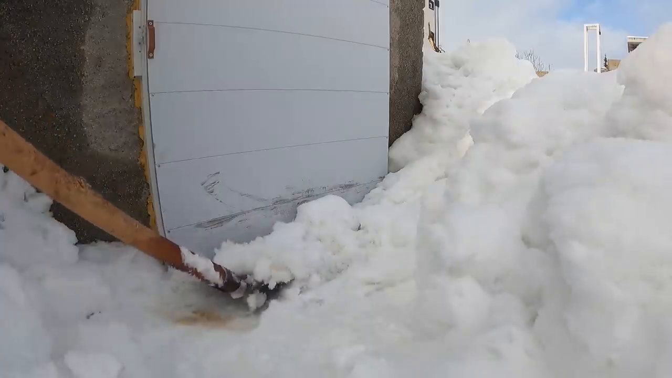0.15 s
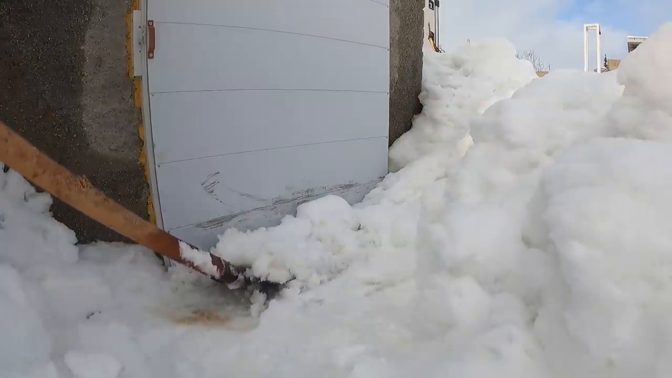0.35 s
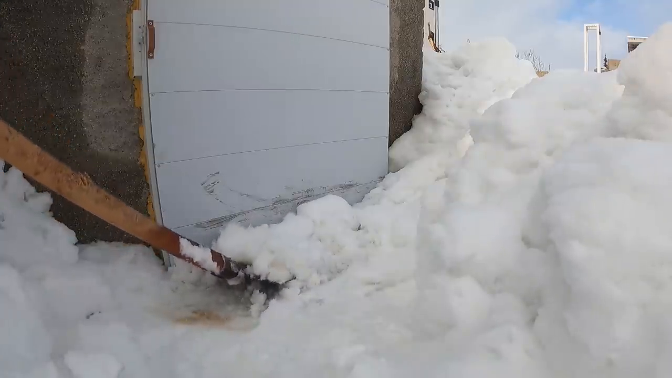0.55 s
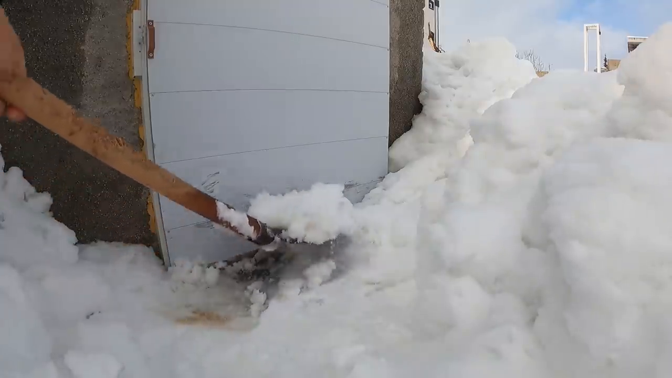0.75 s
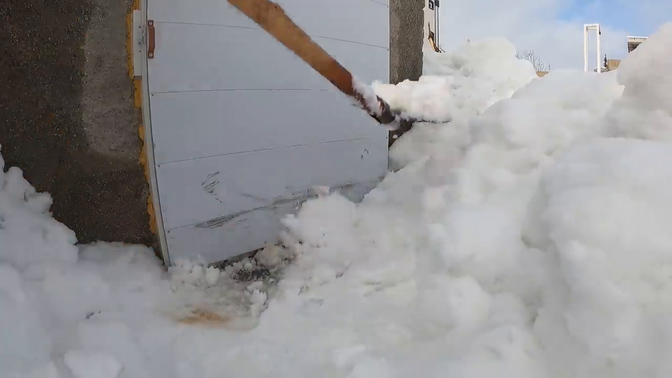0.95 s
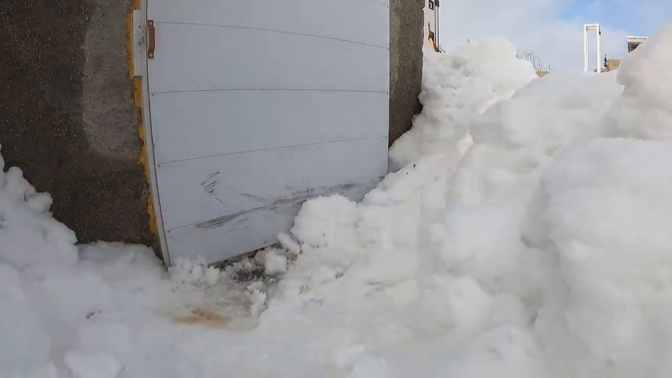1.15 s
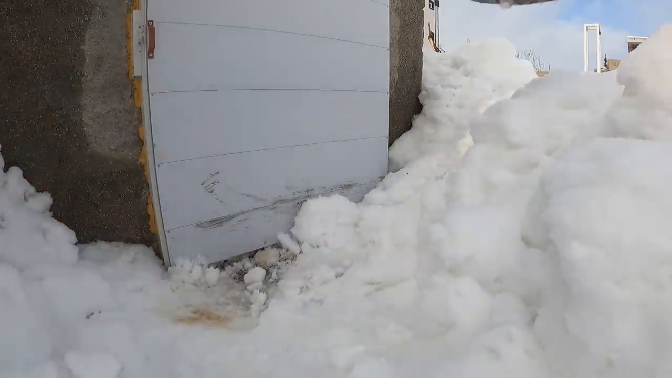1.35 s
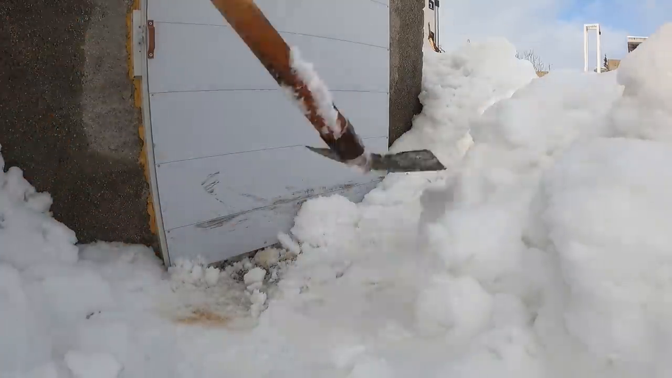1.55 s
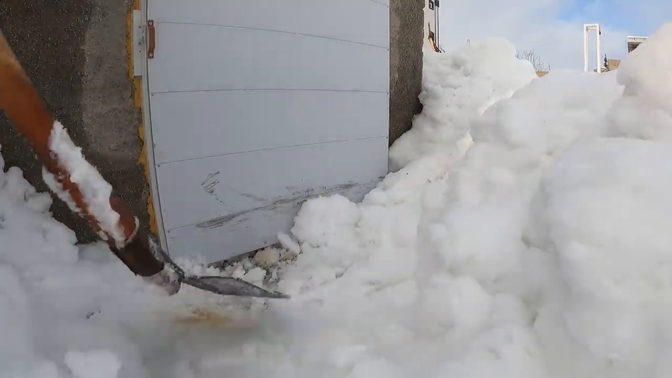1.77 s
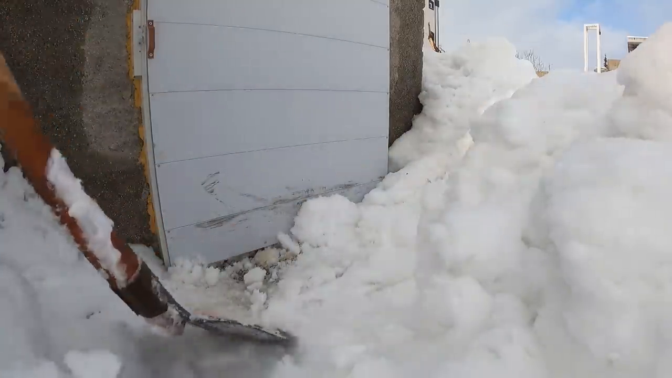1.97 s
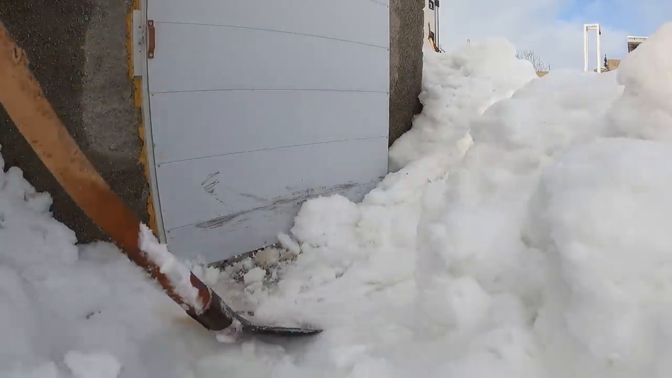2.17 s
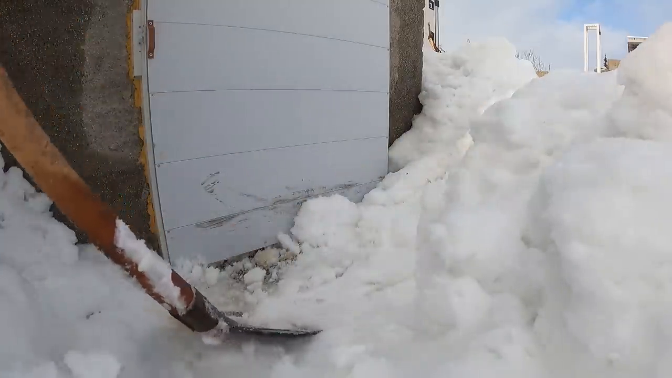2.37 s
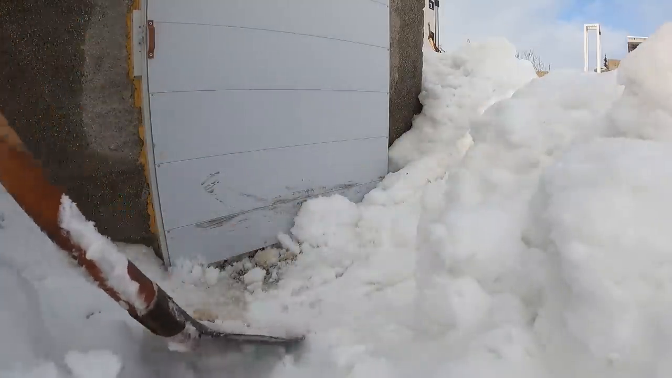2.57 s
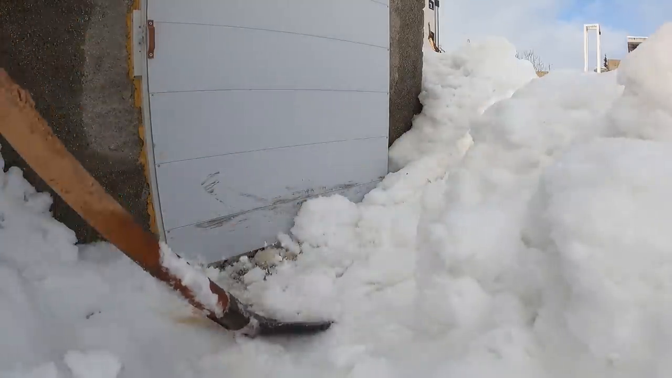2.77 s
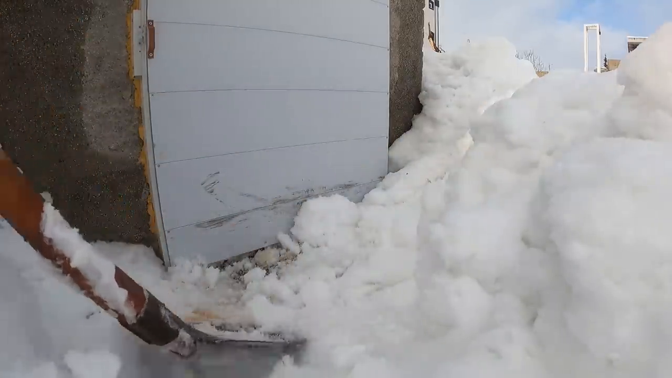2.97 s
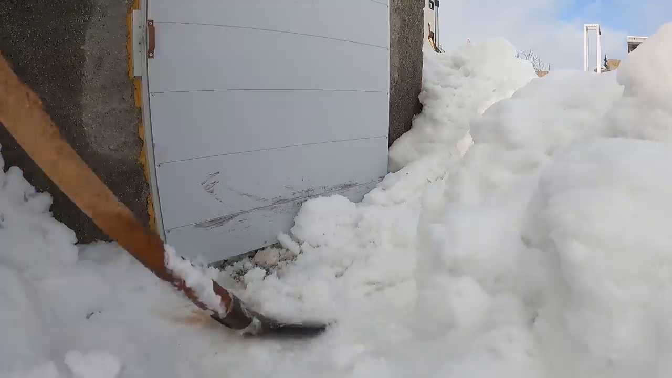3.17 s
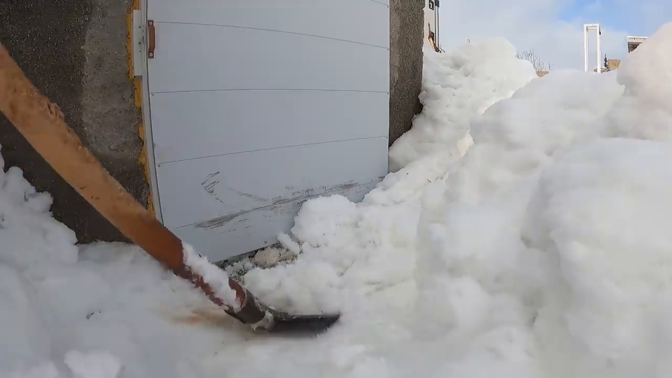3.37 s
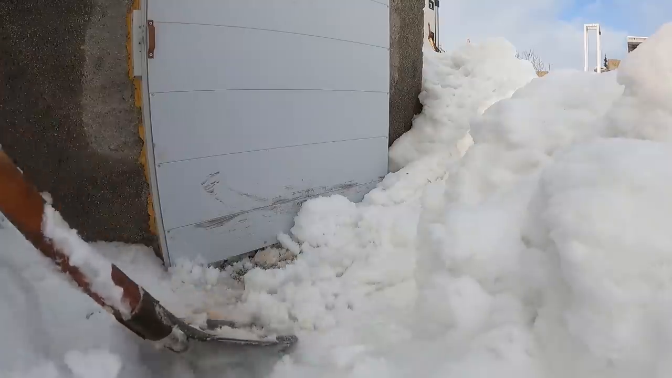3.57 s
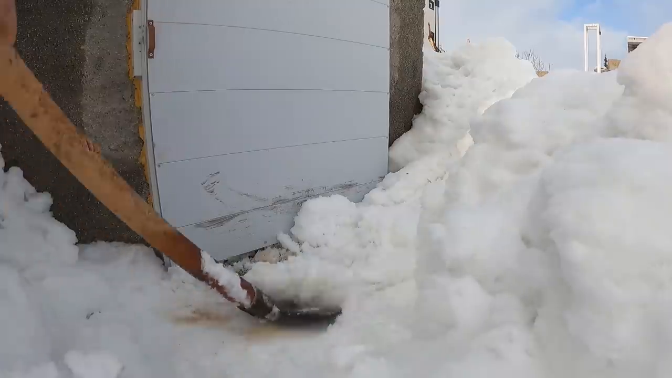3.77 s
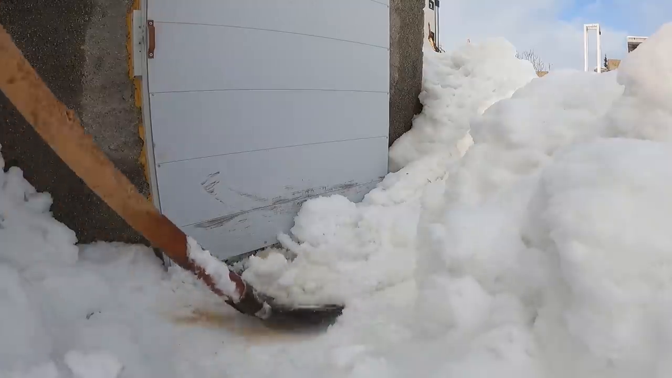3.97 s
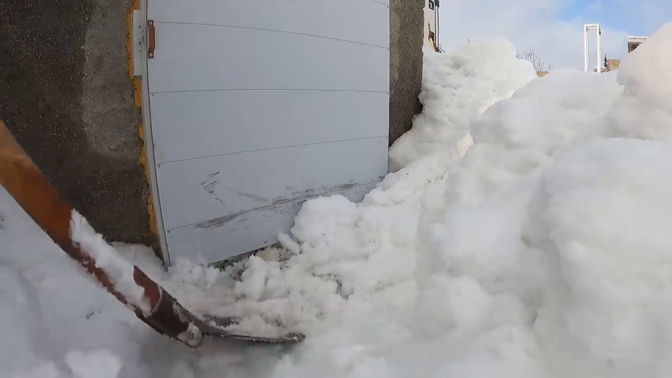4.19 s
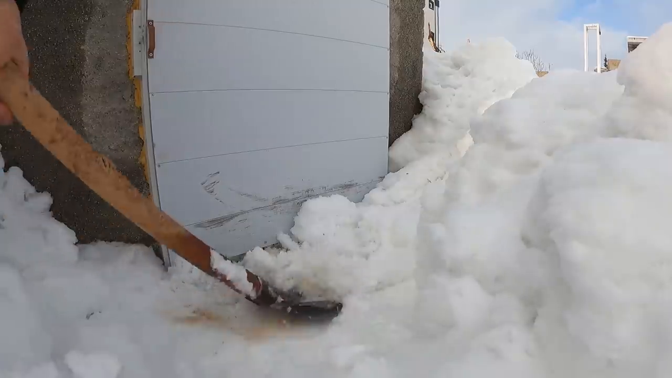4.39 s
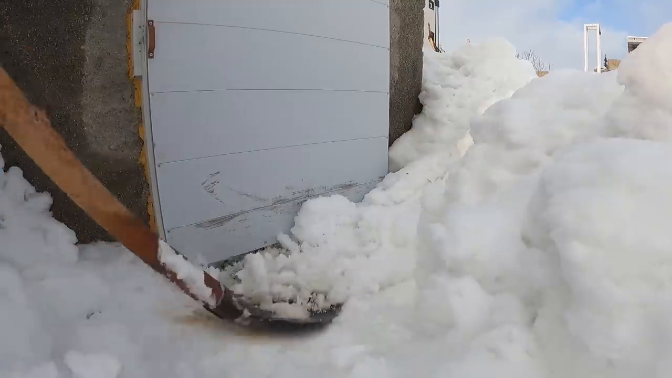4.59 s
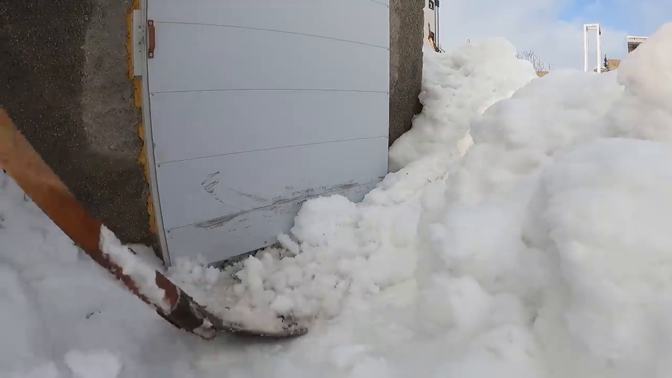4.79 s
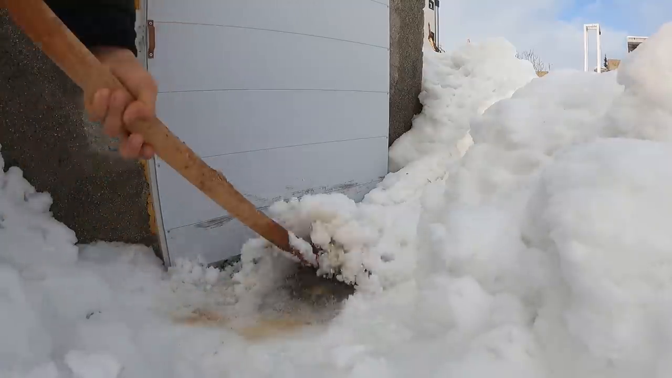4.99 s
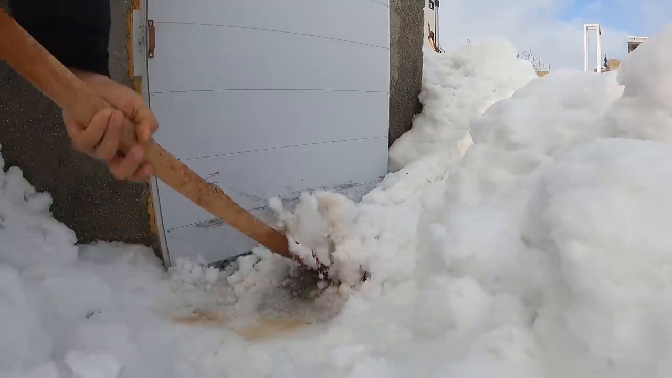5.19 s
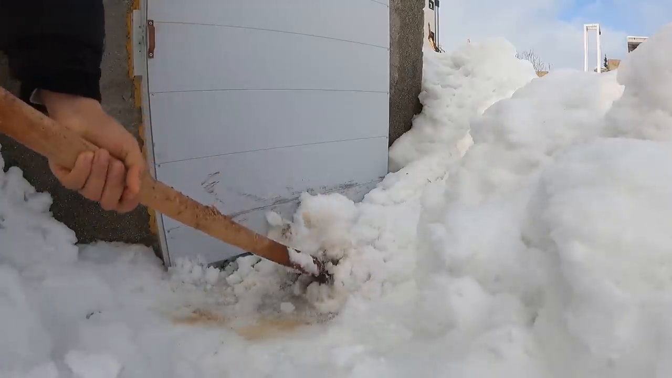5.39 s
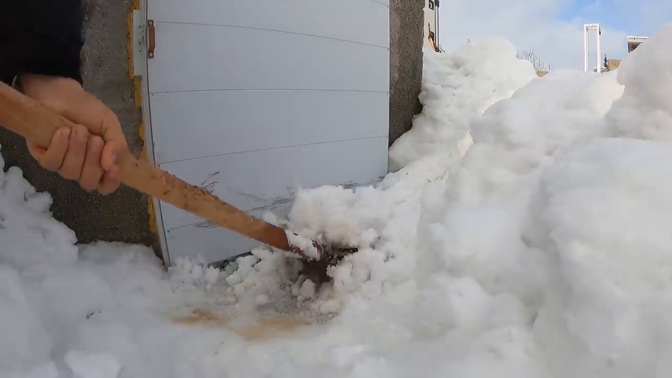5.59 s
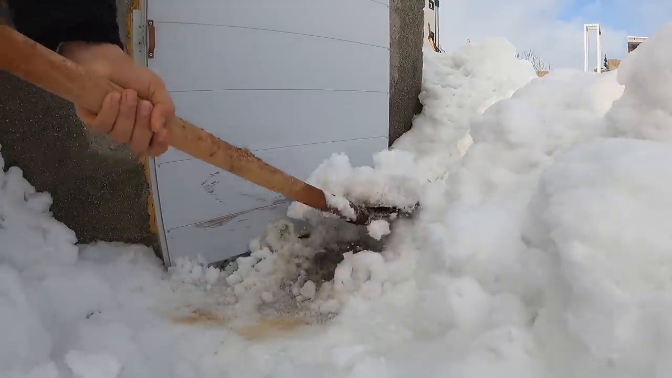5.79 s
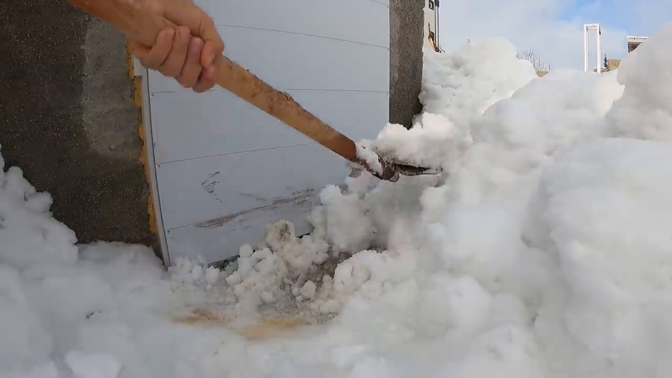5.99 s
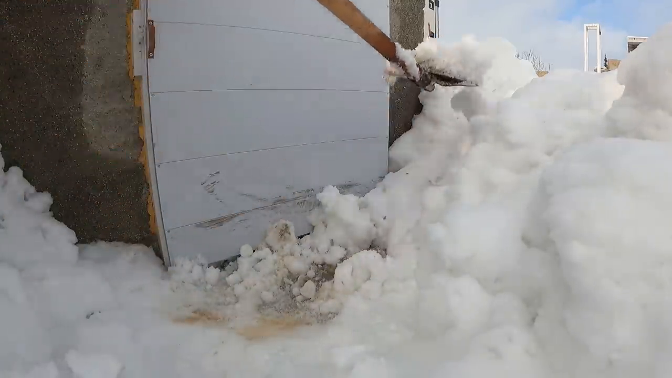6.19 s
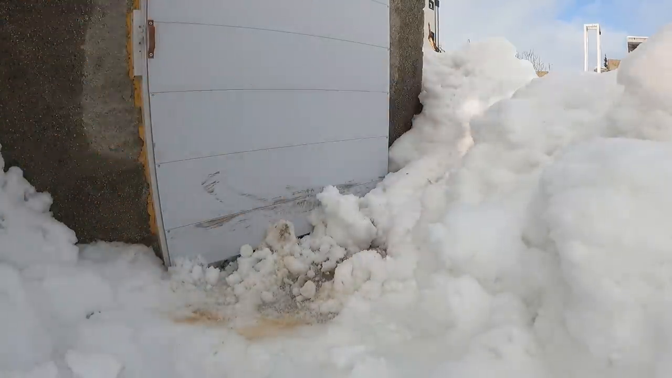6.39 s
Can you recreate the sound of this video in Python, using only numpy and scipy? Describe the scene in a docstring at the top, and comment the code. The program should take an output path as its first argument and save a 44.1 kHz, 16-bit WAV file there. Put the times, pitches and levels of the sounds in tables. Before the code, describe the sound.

A steel shovel works packed snow close by, outdoors, over a very faint distant wash. It opens with a low puff of air on the microphone and soft crumbling as snow slides off the blade. At about 1.0 and 1.4 seconds thrown clods land with crisp snaps and dull splats, and the empty blade rings very faintly. Five short shoves follow, near 2.1, 2.7, 3.2, 3.8 and 4.3 seconds, each a swelling, gritty metallic scrape that stops in a hard crunch, hollow knock and low crump. After each, the blade drags back more quietly, with icy clicks. At about 4.9 seconds comes a longer, louder scrape, stopping dead just after 5.1. Loose snow then slides and trickles, with clods thudding around 5.3 to 5.7 seconds. Light air buffeting, small splats and sifting crumbs fade out by about 6.4 seconds.

```python
"""A steel shovel works packed snow close by: ice bonds fracture in dense clumps, a crunch that also
excites the damped modes of the blade and of the whole shovel. It throws one load and rings faintly,
then is shoved in five times until it jams, and is drawn back each time. A long last scrape fills the
blade; loose snow slides and clods drop as it is lifted. The pack yields with a low crump, moving air
buffets the microphone, and a door and the snow bank scatter the sound over a faint distant noise."""
import sys
import numpy as np
from scipy import signal
from scipy.fft import rfft, irfft, next_fast_len
from scipy.io import wavfile
from scipy.ndimage import uniform_filter1d, map_coordinates

SR = 44100
rng = np.random.default_rng(int(sys.argv[2]) if len(sys.argv) > 2 else 0)


def pcm_store(signal):
    """Save signal as 16-bit PCM."""
    levels = np.round(np.clip(np.atleast_2d(signal), -1, 1) * 32767)
    wavfile.write(sys.argv[1], SR, levels.astype(np.int16).T)


N = 284445

# The blade jams in the bank: (t/s, length/s, crunch/dB, blade hum/dB, shovel knock/dB, snow pack/dB)
JAMS = [(2.196, .018, -16, -23, -13.5, -13), (2.775, .024, -15, -23, -14, -18),
        (3.314, .028, -14, -18, -13, -18), (3.856, .05, -14, -25, -16.5, -20),
        (4.4, .057, -14.5, -23, -17, -23)]


def shovelling():
    """Brittle fracture: firm strokes break snow densely, loose snow crumbles in coarser grains."""
    # Spectra of snow breaking under each kind of movement: (f/Hz, relative level/dB)
    gliding = [(820, -28), (1400, -10), (1750, 0.5), (2030, -3), (2250, -4), (4030, -4.5), (4830, -5),
               (5340, -8.5), (5790, -4), (7290, -5), (10500, -14.5), (12400, -25.5), (15500, -39)]
    crushing = [(820, -26.5), (1400, -3), (1730, 2.5), (1870, -1.5), (2480, 2), (2950, -3.5), (4030, -0.5),
                (5080, 1.5), (5500, -1.5), (7290, -2.5), (9010, -13.5), (12300, -21), (15500, -44)]
    cutting = [(820, -20), (1400, -7), (1950, 0.5), (2340, 1.5), (2750, -1), (4070, -0.5), (4500, -1.5),
               (4920, 0), (6080, -4.5), (7220, -6.5), (8740, -11), (11900, -23.5), (15500, -40.5)]
    dragging = [(820, -70), (1400, -9), (1690, -10), (1890, -3), (2340, -4.5), (3070, -4), (3910, -8),
                (4830, -6), (5180, -5.5), (7440, -8), (11900, -24.5), (14300, -36), (15500, -49.5)]
    crumbling = [(820, -12), (1400, -10), (1560, -5), (1910, -1.5), (2220, -2.5), (2590, -4.5),
                 (3570, -3.5), (7370, -8), (8830, -15), (12100, -22.5), (15500, -44.5)]
    # Snow sifting from the raised blade, one curve per lift: (t/s, level/dB)
    sifting = [
        [(0.99, -48), (1.15, -52), (1.27, -44.5), (1.42, -50), (1.58, -63), (1.8, -70)],
        [(6.05, -50), (6.3, -55), (6.45, -60)],
    ]
    push, jam, cut, pull, loose = pushes(), jams(), scoop(), pulls(), loose_snow()
    thrown = sum(gains(curve)[0] for curve in sifting)
    strokes = (scrape(push, gliding, density=22000, clump_db=0.82, steel_db=4.5)
               + scrape(jam, crushing, density=18000, clump_db=1.1, steel_db=-24.5)
               + scrape(cut, cutting, density=25000, clump_db=0.3, steel_db=-9.5)
               + scrape(pull, dragging, density=16000, clump_db=1.0, steel_db=-25))
    firm_crunch, _, _, firm_pack = push + jam + cut + pull
    loose[0] += amp(-33.5) * lagged(firm_crunch, lag_s=.07)  # debris rolls on after a stroke
    loose_crunch, _, _, loose_pack = loose
    slide = scrape(loose, crumbling, density=9000, clump_db=1.03, steel_db=-0.5)
    grains = fractures(density=5600, clump_db=2.6, patchy_db=3)
    powder = filtered(grains, lambda hz: 1 + (hz / 13000) ** 4)  # fine powder is brighter
    spray = thrown * coloured(powder, crumbling)
    ticks = amp(-7.5) * (loose_crunch + thrown) * crumbs()
    pressure = lagged(firm_pack, lag_s=.016)
    crump = pack(pressure + loose_pack + amp(-1) * thrown)
    return strokes + slide + spray + ticks + crump + air(pressure)


def scrape(drive, spectrum, density, clump_db, steel_db):
    """Forced vibration: one stream of fractures is heard directly and drives the blade and shovel."""
    # Snow-damped modes of the steel, the blade and the whole shovel: (f/Hz, width/Hz, level/dB)
    steel_modes = [(1760, 90, -13.5), (2264, 27, 4.5), (2550, 70, -2.5), (2985, 41, 1.5), (3360, 160, -9.5),
                   (4050, 70, -8), (4400, 32, -15.5), (4970, 150, -0.5), (5770, 160, 0.5), (7180, 50, 7.5)]
    blade_modes = [(975, 173, -4), (1174, 187, 2), (1368, 340, -6)]
    shovel_modes = [(222, 88, -4), (392, 110, 1), (550, 112, 1), (738, 105, -0.5), (918, 100, -8.5)]

    def crunch_response(hz):
        return amp(along(spectrum, hz)) * (1 + amp(steel_db) * resonances(steel_modes, hz, sign=0.92))

    def blade_response(hz):
        return resonances(blade_modes, hz) / (1 + (hz / 2000) ** 4) / (1 + (700 / (hz + 1)) ** 4)

    crunch, hum, knock, _ = drive
    force = fractures(density, clump_db, patchy_db=2.1)
    direct = filtered(force, crunch_response)
    blade = filtered(force, blade_response)
    body = filtered(force, lambda hz: resonances(shovel_modes, hz) / (1 + (hz / 1300) ** 4))
    return crunch * unit(direct) + hum * unit(blade) + lagged(knock, lag_s=.003) * unit(body)


def fractures(density, clump_db, patchy_db):
    """Shot noise of ice bonds, density a second; the wandering contact favours ever new pitches."""
    breaks = (rng.random(N) < density / SR) * rng.standard_normal(N)
    clumps = amp(clump_db * (wobble(330) + wobble(75)))
    spectra = signal.stft(breaks * clumps, nperseg=512)[2]
    patches = uniform_filter1d(rng.standard_normal(spectra.shape), size=3, axis=0)  # across frequency
    patches = uniform_filter1d(patches, size=7, axis=1)  # across time
    return unit(signal.istft(spectra * amp(patchy_db * unit(patches)), nperseg=512)[1][:N])


def pushes(run_up_s=.075, grip_s=.006):
    """Sliding friction: a shove grows louder as the blade gathers speed over the crust."""
    # Forward shoves: (t/s, length/s, crunch at full speed/dB, drop below that at the start/dB)
    shoves = [(2.08, .118, -16.5, 22), (2.686, .091, -21.5, 21), (3.212, .103, -20.5, 31),
              (3.768, .089, -22, 28), (4.322, .077, -24, 19), (4.888, .07, -24, 26)]
    events = []
    for s, length, db, below_db in shoves:
        t = np.arange(int(length * SR)) / SR
        slowness = np.maximum(1 - t / run_up_s, 0) ** 1.8
        envelope = (1 - np.exp(-t / grip_s)) * amp(-below_db * slowness)
        events.append((s, envelope, (db, db - 7.5, db - 9.5, db - 17)))
    return tracks(events)


def jams():
    """Compaction: the bank is crushed at full force for a moment, then stops the blade."""
    return tracks((s, held(length, attack_s=.002, fall_db_per_s=1050), levels_db)
                  for s, length, *levels_db in JAMS)


def scoop():
    """Cutting resistance: the blade slows steadily under the load, then stops dead."""
    # The filling scrape: (t/s, length/s, crunch/dB, blade hum/dB, shovel knock/dB, snow pack/dB)
    filling = (4.952, .176, -12, -19.5, -22, -24.5)
    s, length, *levels_db = filling
    return tracks([(s, held(length, attack_s=.008, fall_db_per_s=1400, sag_db_per_s=40), levels_db)])


def pulls():
    """Sliding friction: the edge bites as it lands, then the drag follows a power of the arm's speed."""
    # Back strokes: (t/s, length/s, drag/dB, bite length/s, bite/dB, blade hum/dB, snow pack/dB)
    back_strokes = [(2.463, .215, -35, .018, -39, -40, -55), (3.027, .18, -38, .08, -30.5, -36, -35),
                    (3.594, .17, -35.5, .02, -22, -28, -33), (4.161, .158, -37.5, .044, -23.5, -23, -37),
                    (4.738, .15, -37, .062, -25, -24, -34)]
    events = []
    for s, length, drag_db, bite_s, bite_db, hum_db, pack_db in back_strokes:
        progress = np.linspace(0, 1, int(length * SR))
        speed = np.abs(np.sin(np.pi * progress ** 1.25))  # fastest late in the pull
        bite = held(bite_s, attack_s=.006, fall_db_per_s=520)
        events.append((s, speed ** .65, (drag_db, drag_db - 6, drag_db - 11)))
        events.append((s, bite, (bite_db, hum_db, hum_db - 5, pack_db)))
    return tracks(events)


def snaps(t60=0.04, attack_s=0.00089):
    """Impulsive fracture: a snap or a jam gives a brief burst of noise and a clack of the blade."""
    # Crust snapping and icy bits hitting steel: (t/s, level/dB, clack relative to it/dB)
    cracks = [(0.5312, -47, -20), (0.9976, -21, -9.5), (1.0794, -22.5, -27), (1.175, -33, -35),
              (1.2, -33, -40), (1.3603, -20, -14), (1.444, -26, -14), (2.7302, -25.5, 0.5),
              (3.995, -28, -12), (4.0484, -22, -13), (4.0856, -19, -40), (4.1659, -17.5, -3.5),
              (4.5307, -28, -10), (4.6618, -20.5, -15), (4.7425, -16, -10), (5.1793, -25, -10),
              (5.1908, -23, -8), (5.3272, -23, -4), (5.8625, -28, -2), (6.07, -22, -35), (6.1863, -24, -20)]
    # Spectra of the chip and the clack: (f/Hz, gain/dB)
    chip = [(900, -43), (2500, 0.5), (5000, 1.5), (7500, -7), (12000, -21), (15500, -36)]
    clack = [(400, -5.5), (1100, 19.5), (2200, 15), (3500, -8), (8000, -41)]
    chips, clacks, t = np.zeros(N), np.zeros(N), np.arange(SR // 10) / SR
    jamming = [(s, crunch_db + 7, -12) for s, _, crunch_db, *_ in JAMS]
    for s, db, clack_db in cracks + jamming:
        burst = rng.standard_normal(len(t)) * amp(db - 60 * t / t60) * (1 - np.exp(-t / attack_s))
        add(chips, s, burst)
        add(clacks, s, burst * amp(clack_db))
    return shaped(chips, chip) + shaped(clacks, clack)


def thuds(knock_hz=445, knock_t60=0.027, thump_hz=122, thump_t60=0.056):
    """Damped oscillation: a blow gives a hollow knock, and the ground answers with a low thump."""
    # Clods and the blade hitting hard snow: (t/s, knock/dB, ground thump/dB)
    blows = [(.999, -21, -13), (1.363, -30, -24), (2.222, -20, -3.5), (3.998, -20, -30), (4.051, -21, -33),
             (4.451, -7, -19), (5.4811, -14, -22), (5.6572, -10, -12)]
    out, t = np.zeros(N), np.arange(SR // 5) / SR

    def mode(hz, t60):
        return amp(-60 * t / t60) * (1 - np.exp(-2 * hz * t)) * np.sin(2 * np.pi * hz * t)

    jamming = [(s, knock_db + 8, pack_db + 2) for s, *_, knock_db, pack_db in JAMS]
    for s, knock_db, thump_db in blows + jamming:
        size = 1 + 0.032 * rng.standard_normal()
        add(out, s, amp(knock_db) * mode(knock_hz / size, knock_t60))
        add(out, s + 0.0023, amp(thump_db) * mode(thump_hz / size, thump_t60))
    return out


def pack(load):
    """Stepwise collapse: the pack gives way under its load with a low crump."""
    # Spectrum of the yielding pack: (f/Hz, relative level/dB)
    yielding = [(40, -21), (60, -3.5), (85, 1), (120, 1), (185, -3.5), (255, -7.5), (340, -18), (700, -57),
                (3000, -120)]
    return load * coloured(fractures(density=1800, clump_db=.8, patchy_db=2.5), yielding)


def loose_snow(weight_share=.45):
    """Granular flow: snow slides off the moving load and trickles back after each stroke."""
    # Snow sliding off a lifted load, one curve per movement: (t/s, crunch/dB, weight on the pack/dB)
    slides = [
        [(0.0, -37, -21), (0.014, -44, -22), (0.028, -31, -24), (0.094, -34, -26), (0.192, -44, -44),
         (0.274, -42, -51), (0.394, -43, -41), (0.456, -50, -34), (0.49, -72, -37)],
        [(0.62, -68, -50), (0.656, -41, -42), (0.708, -39, -26), (0.734, -42, -23), (0.768, -35, -33),
         (0.812, -35, -25), (0.856, -34, -37), (0.98, -43, -40), (0.99, -44, -34)],
        [(5.22, -49, -45), (5.282, -41, -52), (5.32, -39, -39), (5.328, -27, -36), (5.35, -44, -36),
         (5.394, -40, -34), (5.494, -53, -37), (5.576, -69, -51), (5.58, -60, -52)],
        [(5.59, -57, -50), (5.628, -42, -45), (5.662, -39, -25), (5.702, -36, -38), (5.724, -31, -29),
         (5.814, -43, -34), (5.87, -32, -38), (5.894, -32, -33), (5.94, -42, -43)],
        [(5.94, -41, -44), (5.97, -35, -37), (6.166, -41, -47), (6.192, -36, -48), (6.25, -47, -58),
         (6.354, -48, -66), (6.376, -51, -58), (6.4, -58, -76), (6.45, -54, -76)],
    ]
    # Snow settling: (t/s, length/s, crunch/dB, blade hum/dB, shovel knock/dB, snow pack/dB)
    settles = [(1.0, .05, -54, -58, -54, -35), (1.45, .1, -55, -53, -66, -58),
               (1.87, .02, -62, -49, -64, -60), (1.91, .1, -57, -70, -66, -56),
               (2.025, .03, -57, -66, -60, -44), (2.245, .035, -51, -50, -52, -45),
               (2.33, .12, -62, -70, -76, -70), (2.84, .12, -50, -57, -55, -53),
               (2.972, .04, -43, -47, -51, -56), (3.105, .04, -42, -44, -38, -27),
               (3.395, .1, -54, -66, -59, -56), (3.515, .07, -45, -51, -58, -60),
               (3.95, .18, -47, -53, -50, -49), (4.5, .05, -42, -44, -43, -41),
               (4.625, .062, -36.5, -44, -45, -58), (5.14, .06, -45, -49, -44, -39)]
    crunch, weight = sum(gains(curve) for curve in slides)
    knock = crunch ** (1 - weight_share) * weight ** weight_share
    sliding = np.array([crunch, amp(-6) * crunch, amp(-4) * knock, amp(.5) * weight])
    settling = tracks((s, held(length, attack_s=.01, fall_db_per_s=330), levels_db)
                      for s, length, *levels_db in settles)
    return sliding + settling


def crumbs(per_second=170, centre_hz=4400, octaves=2.4, cycles=5, dull_hz=12500):
    """Random collisions: icy crumbs tick as damped sines, each at its own pitch; most are tiny."""
    out, t = np.zeros(N), np.arange(SR // 50) / SR
    for when, size, pitch in rng.random((int(per_second * N / SR), 3)):
        hz = centre_hz * 2 ** (octaves * (pitch - .5))
        tick = amp(-20 * t * hz / cycles) * np.sin(2 * np.pi * hz * t)
        add(out, when * N / SR, size ** 2 * tick)
    return unit(filtered(out, lambda hz: 1 / (1 + (hz / dull_hz) ** 6)))


def splats(attack_s=0.00078):
    """Inelastic impact: a landing clod flattens and falls apart with a dull, quickly fading crush."""
    # Clods bursting on the snow: (t/s, level/dB, t60/s)
    clods = [(0.998, -27, 0.14), (1.362, -29.5, 0.19), (5.331, -27, 0.16), (6.101, -29, 0.04),
             (6.156, -31, 0.054)]
    # Spectrum of the crush: (f/Hz, relative level/dB)
    dull = [(80, -58), (200, 9.5), (330, 4), (560, 4.5), (800, -9), (1500, -23), (4000, -47)]
    crush, t = np.zeros(N), np.arange(SR // 4) / SR
    for s, db, t60 in clods:
        add(crush, s, amp(db - 60 * t / t60) * (1 - np.exp(-t / attack_s)))
    return crush * coloured(fractures(density=4400, clump_db=1.2, patchy_db=2.5), dull)


def ring():
    """Resonance: the emptied blade rings as it swings back, and its edge sings on meeting the crust."""
    # Modes of the free blade and of its bare edge: (f/Hz, width/Hz, level/dB)
    free_modes = [(3140, 62, 3), (4689, 40, -6), (5250, 40, -15), (8400, 40, -23), (8834, 27, -16)]
    edge_modes = [(1340, 120, 3), (2460, 150, -4), (6800, 500, -9)]
    # Ringing during the back swing and at the first touch: (t/s, level/dB)
    swing = [(1.42, -61), (1.57, -57), (1.68, -63), (1.82, -62), (1.9, -72), (2.075, -65)]
    touch = [(2.083, -36), (2.09, -38), (2.125, -32.5), (2.15, -30)]

    def singing(modes):
        peaks = lambda hz: sum(amp(db) / (1 + (2 * (hz - f) / width) ** 2) for f, width, db in modes)
        return unit(filtered(rng.standard_normal(N), peaks))

    flicker = amp(2.5 * wobble(22))
    return gains(swing)[0] * flicker * singing(free_modes) + gains(touch)[0] * singing(edge_modes)


def air(pressure, puff_db=-3, still_db=-58):
    """Turbulence: air buffets the microphone as the shovel swings, and in a puff after each stroke."""
    # Buffeting, one curve per spell of swinging: (t/s, level/dB)
    buffets = [
        [(0.0, -34), (0.07, -16), (0.37, -44), (0.91, -27), (1.31, -48), (1.53, -39), (1.7, -74), (2.0, -41),
         (2.1, -42)],
        [(5.2, -44), (5.282, -52), (5.4, -29), (5.61, -48), (5.648, -33), (6.01, -38), (6.046, -29),
         (6.272, -39), (6.45, -56)],
    ]
    # Spectrum of the moving air: (f/Hz, relative level/dB)
    rumble = [(12, -22), (26, -7), (38, 0), (50, -9), (62, -10), (100, -26), (250, -60), (1500, -120)]
    puffs = amp(puff_db) * lagged(pressure, lag_s=.02)
    flow = sum(gains(curve)[0] for curve in buffets) + puffs + amp(still_db)
    return flow * coloured(rng.standard_normal(N), rumble)


def scatter(x, t60=0.07):
    """Early reflections: short echoes from the door and the snow bank shift as the shovel moves."""
    t = np.arange(SR // 20) / SR
    echoes = rng.standard_normal((2, len(t))) * amp(-60 * t / t60)
    first, second = signal.fftconvolve(x[None], echoes / np.linalg.norm(echoes[0]), axes=1)[:, :N]
    angle = 2 * wobble(8.7)
    return np.cos(angle) * first + np.sin(angle) * second


def outdoors(level_db=-60):
    """Ambient noise: a faint, steady wash from far away."""
    # Spectrum of the distant background: (f/Hz, relative level/dB)
    yard = [(50, -26), (100, -18), (180, -13), (400, -15), (800, -30), (1050, -14), (1250, -5.5),
            (1700, -21.5), (3000, -23), (7000, -22.5), (10000, -34), (13000, -47), (15500, -66)]
    return amp(level_db) * coloured(rng.standard_normal(N), yard)


def amp(db):
    """Decibels as an amplitude ratio."""
    return 10 ** (np.asarray(db) / 20)


def unit(x):
    """Normalisation to rms 1."""
    return x / np.sqrt(np.mean(x ** 2) + 1e-20)


def along(points, hz):
    """Interpolation of (f/Hz, value) points on a logarithmic frequency axis."""
    f, values = np.transpose(points)
    return np.interp(np.log(hz + 1), np.log(f + 1), values)


def gains(rows, fade_s=.003):
    """Envelopes from (t/s, level/dB, ...) rows, one per level column, silent outside their span."""
    rows, t = np.array(rows), np.arange(N) / SR
    s, *columns = rows[np.argsort(rows[:, 0])].T
    inside = np.sqrt(np.clip(.5 + np.minimum(t - s[0], s[-1] - t) / fade_s, 0, 1))
    return np.array([amp(np.interp(t, s, db)) * inside for db in columns])


def held(length, attack_s, fall_db_per_s, sag_db_per_s=0):
    """An envelope that rises, holds or sags for its length, and decays exponentially."""
    t = np.arange(SR // 2) / SR
    level_db = -sag_db_per_s * t - fall_db_per_s * np.maximum(t - length, 0)
    return (1 - np.exp(-t / attack_s)) * amp(level_db)


def tracks(events):
    """(t/s, envelope, levels/dB) events summed as four gains: crunch, blade hum, knock, snow pack."""
    out = np.zeros((4, N))
    for s, envelope, levels_db in events:
        for track, db in zip(out, levels_db):
            add(track, s, amp(db) * envelope)
    return out


def lagged(gain, lag_s):
    """First-order lag: heavier things answer later and for longer."""
    keep = np.exp(-1 / (lag_s * SR))
    return signal.lfilter([1 - keep], [1, -keep], gain)


def wobble(rate):
    """Random modulation: a smooth curve with rate knots a second."""
    knots = rng.standard_normal(int(N * rate / SR) + 4)
    return map_coordinates(knots, [np.arange(N) * rate / SR], order=2)


def filtered(x, response):
    """Linear filtering: the spectrum of x times a complex function of frequency."""
    size = next_fast_len(N + 8192)
    return irfft(rfft(x, size) * response(np.fft.rfftfreq(size, 1 / SR)), size)[..., :N]


def resonances(modes, hz, sign=-1):
    """Modal superposition of damped resonators; sign -1 makes neighbours swing opposite ways."""
    return sum(sign ** k * amp(db) * 1j * hz * width / (f * f - hz * hz + 1j * hz * width)
               for k, (f, width, db) in enumerate(modes))


def shaped(x, curve):
    """Zero-phase filtering by an (f/Hz, gain/dB) curve."""
    return filtered(x, lambda hz: amp(along(curve, hz)))


def coloured(x, spectrum):
    """Spectral shaping, normalised to rms 1."""
    return unit(shaped(x, spectrum))


def add(track, s, sound):
    """Superposition of a sound on a track, starting at s seconds."""
    part = track[max(0, round(s * SR)):][:len(sound)]
    part += sound[:len(part)]


def scene():
    """Mid-side stereo: all sound comes from ahead; scatter makes the sides differ in the treble."""
    # Scattered sound, opposite in the two channels: (f/Hz, gain/dB)
    unshared = [(60, -32), (250, -27), (500, -23), (1100, -21), (2200, -12), (4500, -13), (8000, -12),
                (12500, -4)]
    # Left relative to right: (f/Hz, level/dB) and (f/Hz, phase/rad)
    lean = [(120, -.1), (300, -.4), (600, -1.1), (1200, -.4), (2400, .5), (4400, .7), (8000, 1.8),
            (13000, -.6)]
    lead = [(300, 0), (1400, -.1), (3400, -.36), (7500, -.3), (10500, -.4), (13000, .1)]
    near = shovelling() + snaps() + thuds() + splats() + ring() + outdoors()
    side = shaped(scatter(near), unshared)
    signs = np.array([[1], [-1]])
    balance = lambda hz: amp(signs * along(lean, hz) / 2) * np.exp(.5j * signs * along(lead, hz))
    return filtered(near + signs * side, balance)


def record(dry, low_hz=28, top_hz=15700):
    """Soft saturation rounds the highest peaks; band limiting sheds deep rumble and the top treble."""
    rounded = dry / (1 + np.abs(dry) ** 6) ** (1 / 6)
    return filtered(rounded, lambda hz: (hz < top_hz) / np.sqrt(1 + (low_hz / (hz + 1)) ** 6))


dry = scene()
out = record(dry)
pcm_store(out)
```